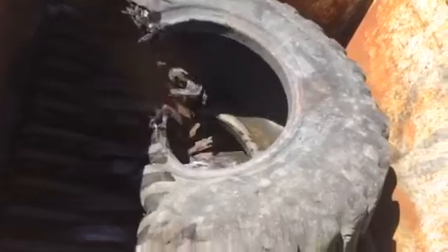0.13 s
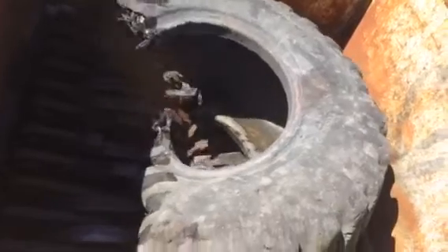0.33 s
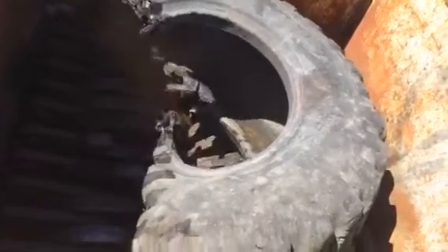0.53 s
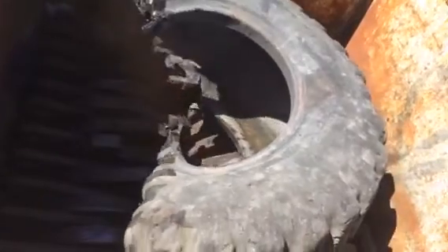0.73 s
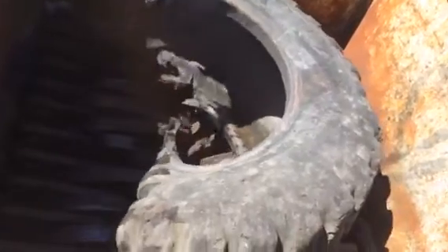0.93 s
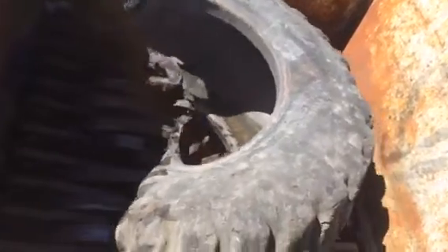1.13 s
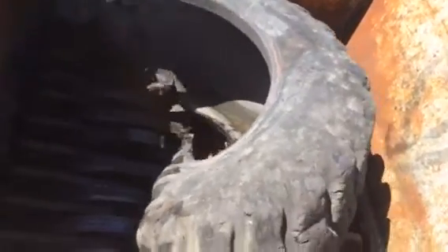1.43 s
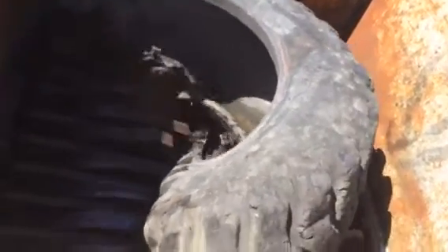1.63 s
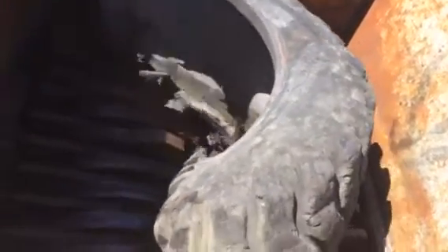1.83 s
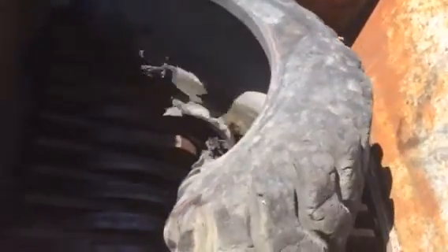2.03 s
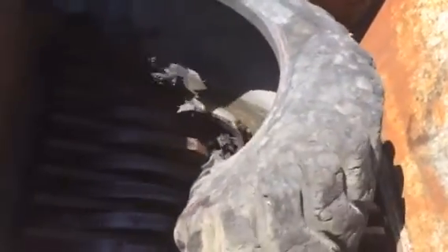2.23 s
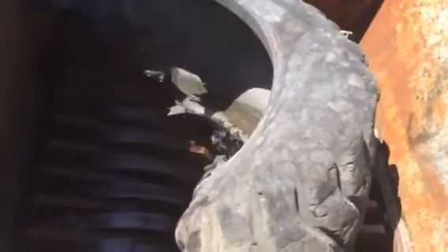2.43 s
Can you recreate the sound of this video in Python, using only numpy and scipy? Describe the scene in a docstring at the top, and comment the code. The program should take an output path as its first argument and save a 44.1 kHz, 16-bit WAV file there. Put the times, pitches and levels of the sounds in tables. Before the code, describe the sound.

Tire shredder at work, heard through a small mono microphone with a harsh treble edge: constant throbbing engine hum, faint pump whine, coarse grinding and creaks, busy early snaps, then sparser cracks and one late bouncing knock.

```python
"""A large shredder grinds a tire outdoors: its cutters tear rubber in a patchy crackle of tiny noise cracks,
with louder snaps, a coarse grind, pitched creaks, one knock with a bounce and a short squeal.
A six-cylinder diesel drones at steady speed and beats against a second shaft hum, and a hydraulic pump whines;
these are sums of wavering tones. A broad roar of shaped noise lies behind it all."""
import sys
import numpy as np
from scipy import signal
from scipy.fft import rfft, irfft, next_fast_len
from scipy.io import wavfile
from scipy.ndimage import uniform_filter1d

SR = 44100
rng = np.random.default_rng(int(sys.argv[2]) if len(sys.argv) > 2 else 0)


def store_pcm(level_fs):
    """Save levels as 16-bit WAV."""
    pcm = np.round(np.clip(level_fs, -1, 1) * 32767).astype(np.int16)
    wavfile.write(sys.argv[1], SR, np.atleast_2d(pcm).T)


N = 113337  # length in samples


def undb(db):
    """Turn decibels into an amplitude factor."""
    return 10 ** (np.asarray(db) / 20)


def level(x, db):
    """Scale a sound to a given rms level in dB."""
    return x * undb(db) / np.sqrt(np.mean(x ** 2))


def curve(rows, axis=1):
    """Draw straight lines through one column of a table whose first column is time."""
    rows = np.array(rows, float)
    return np.interp(np.arange(N) / SR, rows[:, 0], rows[:, axis])


def walk(rate):
    """Random levels held 1 / rate s and smoothed twice; spread near 1."""
    hold = int(SR / rate)
    steps = np.repeat(rng.standard_normal(N // hold + 1), hold)
    return 1.3 * uniform_filter1d(uniform_filter1d(steps, hold), hold)[:N]


def colour(x, points):
    """Shape a spectrum by (f/Hz, level/dB) points, joined along a logarithmic pitch scale."""
    points, size = np.array(points, float), next_fast_len(N)
    hz = np.maximum(np.arange(size // 2 + 1) * SR / size, 1)
    gain_db = np.interp(np.log(hz), np.log(points[:, 0]), points[:, 1])
    return irfft(rfft(x, size) * undb(gain_db), size)[:N]


def band(x, hz, width_hz):
    """Keep a resonant band around one frequency."""
    return signal.lfilter(*signal.iirpeak(hz, hz / width_hz, SR), x)


def tone(hz, db, start, waver_db, drift):
    """A machine tone whose level (dB) and timing (radians of phase) waver a little."""
    loudness = np.sqrt(2) * undb(db + waver_db * walk(3.9))
    phase = 2 * np.pi * hz * (np.arange(N) / SR - start) + drift * walk(3)
    return loudness * np.cos(phase)


GRAINS_PER_S, GRAIN_SPREAD_DB, GRAIN_T60_S = 6200, 2.5, 0.02


def ragged_cracks():
    """Loudness of a dense swarm of tiny cracks, uneven in size, each with a short fading tail."""
    chance = rng.random((2, N))
    # the squared loudness adds up, so each crack is a puff of power
    cracks = (chance[0] < GRAINS_PER_S / SR) * undb(-2 * GRAIN_SPREAD_DB * np.log(1 - chance[1]))
    fade = np.exp(-2 * np.log(1000) / (GRAIN_T60_S * SR))
    swarm = np.sqrt(signal.lfilter([1], [1, -fade], cracks) + 1e-9)
    return level(np.minimum(swarm, 1.7 * np.median(swarm)), 0)


# Snaps of cord and rubber, levels before the shared trims: t/s, peak level/dB,
# low crunch level/dB against treble, fade by 60 dB t/s, middle band level/dB against treble
CORD_SNAPS = [(0.023, -16, -15, 0.16, 1.5), (0.1154, -21, -24, 0.037, 12.5), (0.159, -9, -11, 0.1, -9),
              (0.233, -20.5, -12, 0.14, -13), (0.296, -21, -10, 0.11, -3), (0.3406, -23, -7, 0.1, -3),
              (0.3626, -27.5, -9, 0.088, 15), (0.48, -26, -8, 0.073, -1), (0.586, -27, 2, 0.11, -14),
              (0.611, -20.5, 3, 0.14, -3), (0.671, -34, 8, 0.11, 0), (0.7153, -31, 4, 0.11, 9),
              (0.81, -32, 11, 0.13, -5), (0.843, -21.5, 5, 0.16, -1), (0.9727, -23.5, -12, 0.16, 2.5),
              (1.0008, -22, 3, 0.1, -10), (1.783, -27, 2, 0.17, 1), (1.8004, -17, -17.5, 0.16, -8),
              (1.8772, -20.5, 2.5, 0.12, 2), (2.0603, -17.5, -27, 0.13, 0.5),
              (2.0976, -20.5, -3, 0.15, 2.5), (2.14, -23.5, 15.5, 0.057, -14), (2.167, -20.5, 2, 0.16, -9),
              (2.2134, -23.5, 10.5, 0.072, -9), (2.2328, -13, -20, 0.14, -16), (2.3106, -28, -16, 0.12, -7),
              (2.4925, -24, 4, 0.11, 4)]
SNAP_RISE_S, SNAP_TRIM_DB = 0.00047, -7.5
CRACK_DB, CRACK_T60_S = 5, .01  # extra sharp start of each snap


def snaps():
    """Power of the snaps in treble, middle and low bands: each rises fast and fades evenly in dB."""
    t, treble, middle, low = np.arange(N) / SR, 0, 0, 0
    for start, db, low_db, t60, middle_db in CORD_SNAPS:
        u = np.maximum(t - start, 0)
        shape = (1 - np.exp(-u / SNAP_RISE_S)) * undb(db + SNAP_TRIM_DB - 60 * u / t60)
        power = shape ** 2
        treble = treble + power * (1 + undb(2 * (CRACK_DB - 60 * u / CRACK_T60_S)))
        middle = middle + power * undb(2 * middle_db)
        low = low + power * undb(2 * low_db)
    return treble, middle, low


CHIRPS_PER_S, CHIRP_LO_HZ, CHIRP_HI_HZ, CHIRP_T60_S, CHIRP_DB = 220, 900, 2400, .06, -6


def chirps():
    """Short pitched creaks of stretched rubber and wire, scattered in time and pitch."""
    rows, out = rng.random((1200, 4)), np.zeros(N + 4096)
    u = np.arange(4096) / SR
    starts = np.cumsum(-np.log(1 - rows[:, 0])) / CHIRPS_PER_S
    for start, (_, pitch, size, glide) in zip(starts, rows):
        if start * SR < N:
            hz = CHIRP_LO_HZ * (CHIRP_HI_HZ / CHIRP_LO_HZ) ** (pitch ** 1.6)
            # higher creaks are weaker
            db = 6.9 * size - 60 * u / CHIRP_T60_S - 4 * np.log2(hz / 1000)
            shape = (1 - np.exp(-u / 0.0025)) * undb(db)
            first = int(start * SR)
            out[first:first + 4096] += shape * np.sin(2 * np.pi * hz * u * (1 + 2.24 * (glide - .5) * u))
    return level(out[:N], CHIRP_DB)


GRIND_HZ, GRIND_WIDTH_HZ, GRIND_DB = 1242, 730, -6


def grind():
    """Coarse lumpy noise in a middle band, joined by the creaks."""
    lumps = undb(2.5 * walk(70)) * rng.standard_normal(N)
    once = band(lumps, GRIND_HZ, GRIND_WIDTH_HZ)
    return level(band(once, GRIND_HZ, GRIND_WIDTH_HZ), GRIND_DB) + chirps()


# Tone colour of tearing rubber, relative: f/Hz, level/dB
TEAR_COLOUR = [(400, -47), (1000, 0.5), (2200, 0), (2800, -2.5), (3300, 1), (5000, -2.5), (8000, -4.5),
               (10000, -8), (15000, -5.5)]
# How hard the cutters tear, before the trims: t/s, crackle level/dB, grind level/dB
TEARING_FORCE = [(0, -26.5, -31.5), (.09, -31, -30.5), (.2, -39, -33), (.29, -35.5, -31), (.4, -31, -29.5),
                 (.5, -32, -34.5), (.57, -36, -32), (.65, -34.5, -29), (.78, -31.5, -29.5), (.9, -31, -30),
                 (.95, -40, -31.5), (1.03, -40, -34), (1.17, -46.5, -33), (1.4, -50, -35),
                 (1.48, -41.5, -32.5), (1.56, -46.5, -37), (1.7, -41.5, -32), (1.95, -46, -32.5),
                 (2.05, -43, -34), (2.18, -42, -27), (2.33, -43, -32), (2.45, -42, -35), (2.57, -44.5, -38)]
SPLIT_HZ = 4400  # border between middle and treble
CRUNCH_HZ, CRUNCH_WIDTH_HZ = 1500, 440


def tearing():
    """Cutters tear rubber: noise follows the patchy cracks and snaps, with low crunch and grind below."""
    ragged = ragged_cracks()
    bed = ragged * undb(curve(TEARING_FORCE) + 1.8 * walk(14.4))
    snap, middle, low = snaps()

    def torn_noise(power, side):
        noise = np.sqrt(bed ** 2 + power * ragged) * rng.standard_normal(N)
        return signal.lfilter(*signal.butter(2, SPLIT_HZ, side, fs=SR), noise)

    # a single click shows how much the colouring changes the level
    click = colour(np.eye(1, N)[0], TEAR_COLOUR)
    crackle = colour(torn_noise(snap, "high") + torn_noise(middle, "low"), TEAR_COLOUR)
    crackle = crackle / np.sqrt(np.sum(click ** 2))
    crunch = level(band(rng.standard_normal(N), CRUNCH_HZ, CRUNCH_WIDTH_HZ), -7.5) * np.sqrt(low)
    return undb(-6) * crackle + crunch + grind() * undb(curve(TEARING_FORCE, axis=2))


# Ringing tones of the hopper plate: f/Hz, level/dB, fade by 60 dB t/s
PLATE_MODES = [(121, -40, 0.091), (340.3, -12, 0.073), (540, -25, 0.091), (930, -30, 0.067),
               (1460, -24, 0.056)]
KNOCK_S, KNOCK_PUSH_S = 2.2355, .0015
BOUNCE_S, BOUNCE_DB = 0.016, -7  # delay and level after the first blow
RATTLE_DB, RATTLE_T60_S = -21, .1


def knock():
    """The tire slams the hopper plate and bounces once; the plate rings in fading tones and rattles."""
    out = 0
    noise = level(band(band(rng.standard_normal(N), 800, 1300), 800, 1300), RATTLE_DB)
    for start, blow_db in (KNOCK_S, 0), (KNOCK_S + BOUNCE_S, BOUNCE_DB):
        u = np.maximum(np.arange(N) / SR - start, 0)
        ring = sum(undb(db - 60 * u / t60) * np.sin(2 * np.pi * hz * u) for hz, db, t60 in PLATE_MODES)
        rattle = noise * undb(-60 * u / RATTLE_T60_S)
        out = out + undb(blow_db) * (ring + rattle) * (1 - np.exp(-u / KNOCK_PUSH_S))
    return out


# Squeal of metal on rubber, before its flutter: t/s, level/dB
SQUEAL_LEVEL = [(.008, -57), (.022, -28.5), (.04, -35), (.06, -40), (.085, -39), (.1, -56), (.135, -55),
                (.15, -65)]
SQUEAL_HZ, SQUEAL_RISE_HZ_PER_S = 8780, 450


def squeal():
    """A thin stick-slip tone that rises slightly, flutters and dies."""
    t = np.arange(N) / SR
    on = (t > SQUEAL_LEVEL[0][0]) & (t < SQUEAL_LEVEL[-1][0])
    loudness = np.sqrt(2) * undb(curve(SQUEAL_LEVEL) + 1.9 * walk(110))
    turns = (SQUEAL_HZ + SQUEAL_RISE_HZ_PER_S * t / 2) * t
    return on * loudness * np.sin(2 * np.pi * turns + .4 * walk(60))


# Tones of the diesel: multiple of the cycle rate, level/dB (rms before the gain),
# gain (a minus sign flips the wave)
ENGINE_TONES = [(4, -29, 0.094), (6, -25.5, 1), (9, -35.5, 0.92), (10, -39.5, 1), (11, -38, -1.2),
                (12, -31.5, -1.11), (14, -53.5, 0.96), (16, -29.5, -0.85), (18, -34.5, 0.53)]
CYCLE_HZ, FIRST_FIRING_S = 15.002, -.0026  # a cycle is two crank turns with six firings


def engine():
    """A six-cylinder diesel: firing pulses repeat every cycle, giving tones at multiples of its rate."""
    return sum(gain * tone(k * CYCLE_HZ, db, FIRST_FIRING_S, waver_db=0.38, drift=0.027)
               for k, db, gain in ENGINE_TONES)


# Tones of the second shaft, before the slow level below: multiple of the shaft rate, level/dB
SHAFT_TONES = [(1, -40), (2, -22.5), (3, -50), (4, -45.5)]
# Slow level of the shaft hum: t/s, level/dB
SHAFT_SWELL = [(0, -5.5), (.35, -3), (.6, -0.5), (1.5, 1), (2.57, -0.5)]
SHAFT_HZ, FIRST_CREST_S = 51.89, -.0011


def shaft():
    """A second turning shaft hums at multiples of its rate and beats against nearby engine tones."""
    hum = sum(tone(k * SHAFT_HZ, db, FIRST_CREST_S, waver_db=0.16, drift=0.041) for k, db in SHAFT_TONES)
    return undb(curve(SHAFT_SWELL)) * hum


# Tones of the hydraulic pump: multiple of the piston rate, level/dB
PUMP_TONES = [(2, -46), (4, -44.5), (5, -42.5)]
PUMP_HZ = 238.55


def pump():
    """A hydraulic pump whines at multiples of its piston rate."""
    return sum(tone(k * PUMP_HZ, db, 0, waver_db=1.0, drift=0.13) for k, db in PUMP_TONES)


# Tone colour of the steady roar of engine, fan and housing, relative: f/Hz, level/dB
ROAR_COLOUR = [(25, -19), (48, -0.5), (70, 0.5), (130, -4.5), (200, -5), (260, -13), (400, -24), (640, -29),
               (850, -21), (1100, -18.5), (1500, -22), (1900, -33.5), (2250, -32.5), (2750, -41.5),
               (3300, -39.5), (5000, -47.5), (8000, -51), (10000, -58.5), (15000, -43)]
ROAR_DB = -25


def roar():
    """Broad noise of engine, fan and housing, lightly throbbing with the firings."""
    throb = 1 + 0.067 * np.cos(2 * np.pi * 6 * CYCLE_HZ * np.arange(N) / SR)
    noise = throb * undb(0.74 * walk(8.62)) * rng.standard_normal(N)
    return level(colour(noise, ROAR_COLOUR), ROAR_DB)


def scene():
    """All the sources added together, as one channel."""
    cutting = tearing() + knock() + squeal()
    drive = engine() + shaft() + pump()
    return (cutting + drive + roar())[None]


def top_cut(x):
    """Nothing passes above the cut-off."""
    return signal.sosfilt(signal.butter(12, 15250, fs=SR, output="sos"), x)


MIC_HZ, MIC_WIDTH_HZ, MIC_PEAK_DB, MIC_TOP_HZ = 7135, 630, 17.5, 7600
BEND = 0.063  # strength of the lopsidedness


def record(dry):
    """A small microphone with a sharp treble resonance and a steep fall above it."""
    bent = dry - BEND * (dry ** 2 - np.mean(dry ** 2))  # slightly lopsided diaphragm
    resonant = bent + (undb(MIC_PEAK_DB) - 1) * band(bent, MIC_HZ, MIC_WIDTH_HZ)
    mix = signal.sosfilt(signal.butter(3, MIC_TOP_HZ, fs=SR, output="sos"), resonant)
    return top_cut(mix)


dry = scene()
out = record(dry)
store_pcm(out)
```